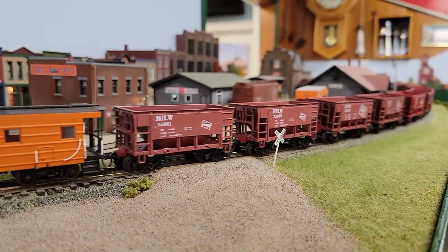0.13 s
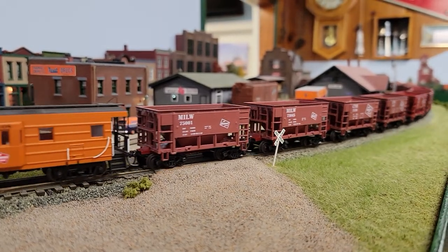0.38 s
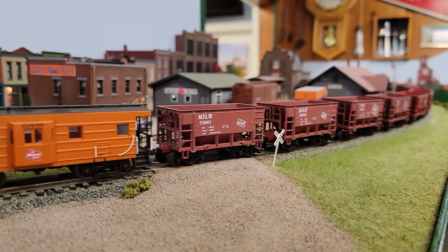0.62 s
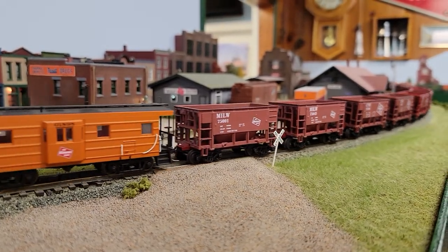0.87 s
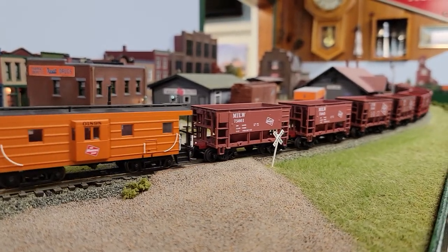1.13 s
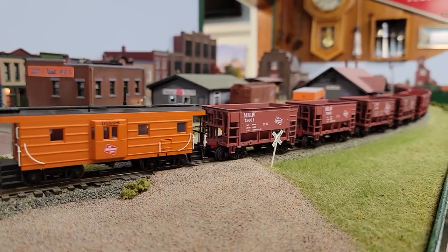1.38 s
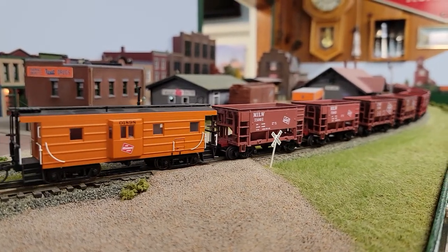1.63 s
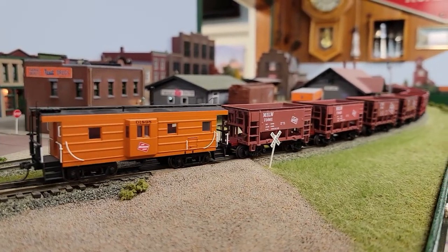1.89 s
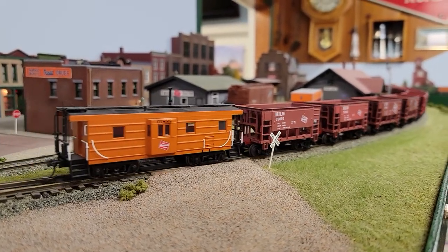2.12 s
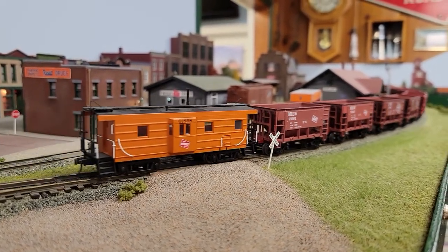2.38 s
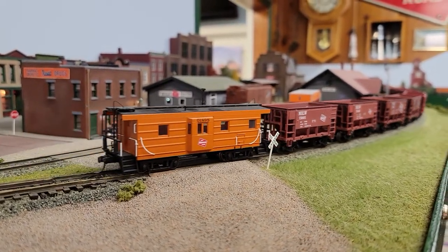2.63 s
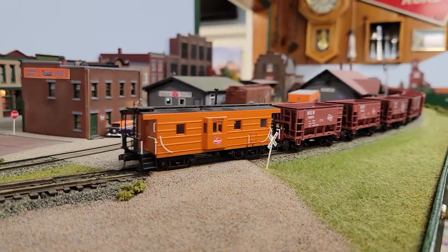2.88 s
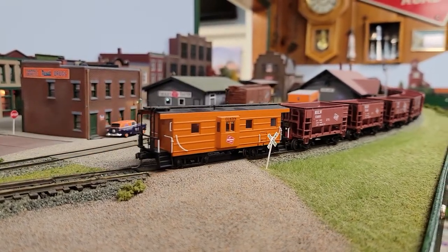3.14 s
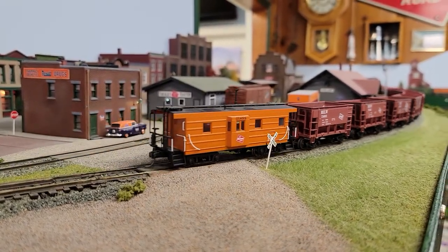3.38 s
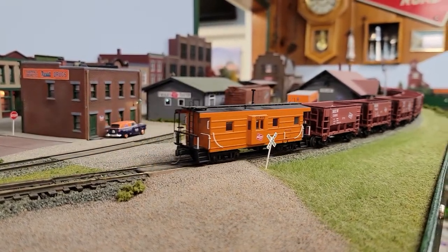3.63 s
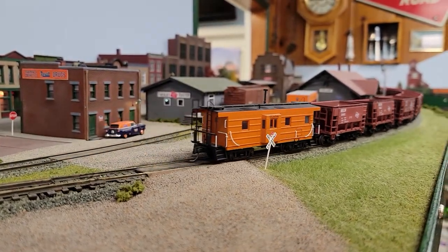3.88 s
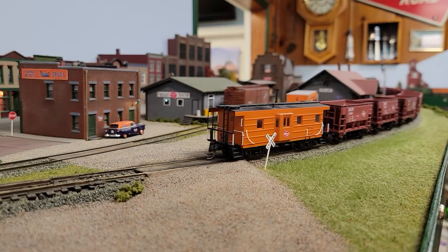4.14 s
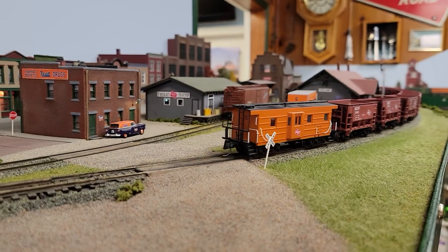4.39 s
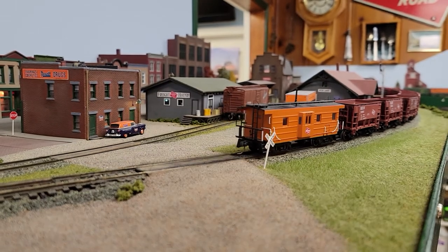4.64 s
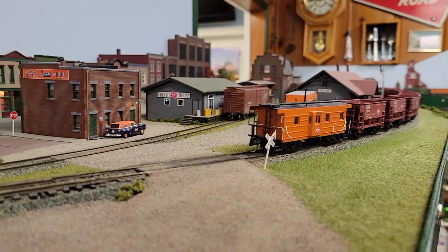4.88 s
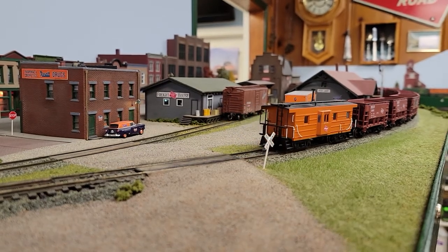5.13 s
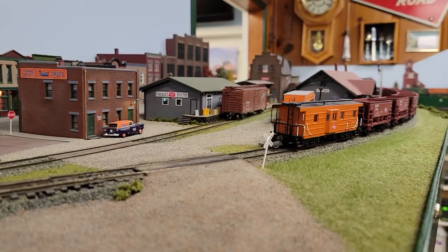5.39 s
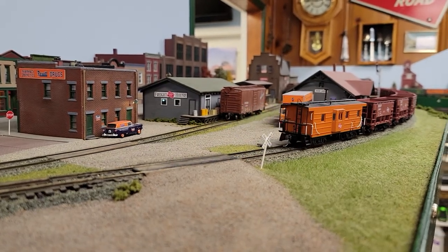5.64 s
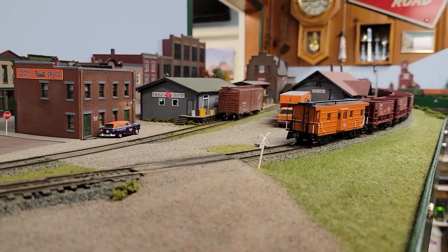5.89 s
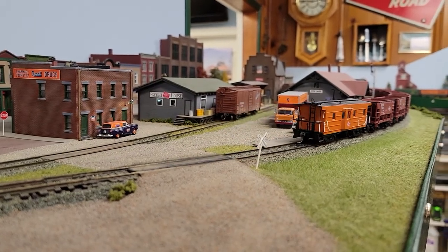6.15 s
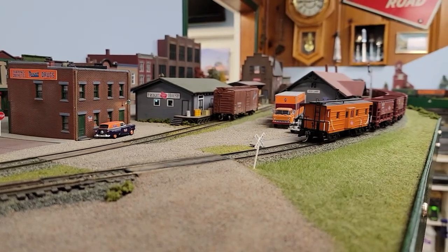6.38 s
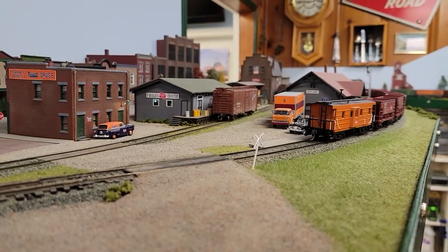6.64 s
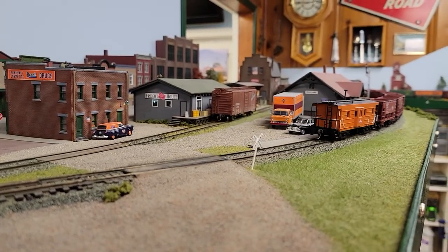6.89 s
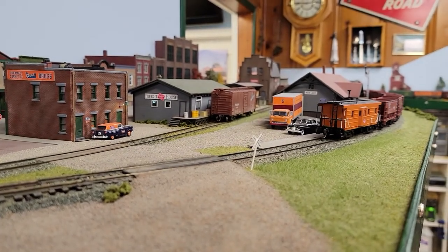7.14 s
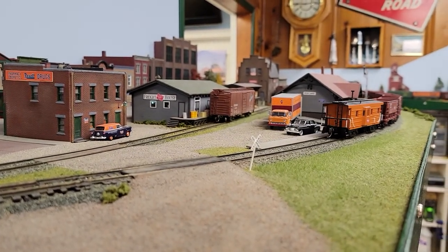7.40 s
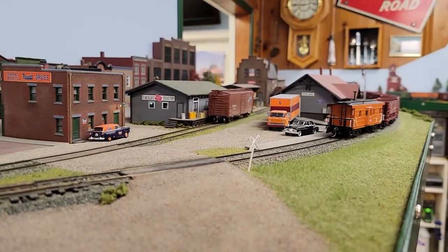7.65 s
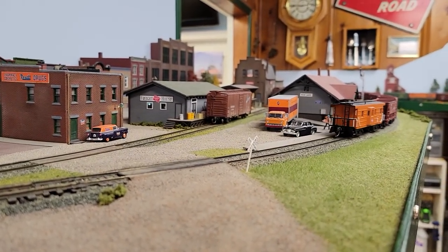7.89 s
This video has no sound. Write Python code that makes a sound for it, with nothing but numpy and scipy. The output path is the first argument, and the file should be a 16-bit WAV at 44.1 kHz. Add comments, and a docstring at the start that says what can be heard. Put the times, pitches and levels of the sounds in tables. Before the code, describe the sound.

A deep constant hum from a compressor, fan and mains gear fills an indoor room. Over it, model train wheels grind softly on rails, car bodies ringing in gentle recurring swells. Thin axle whistles waver early on, flanges scuff briefly, and a few dull knocks come later, closer to the right. The train slowly recedes from a close stereo pair with very faint treble hiss.

```python
"""Wheels grind softly on rails and set car bodies and track ringing as a short model train rolls away.
It follows a curve on a table layout in a furnished room: the rolling is gritty noise, the ringing narrow bands.
Two axles whistle as fluttering sines, tight spots of the wheels sing short notes, flanges scuff, a few pops knock.
A compressor, a fan and mains gear hum in partials over moving air, hiss and faint high tones.
A close pair of microphone ports hears the layout, each with its own level and delay across the spectrum."""
import sys
import numpy as np
from scipy import signal
from scipy.fft import rfft, irfft, next_fast_len
from scipy.io import wavfile

SR = 44100
rng = np.random.default_rng(int(sys.argv[2]) if len(sys.argv) > 2 else 0)


def nominal_scale(level):
    """Amplitude ratio for a level in decibels (scalar or array-like)."""
    x = np.asarray(level, float) / 20
    return 10 ** x


def bounce(signal):
    """Save signal as a 16-bit WAV file at the path given by the first command-line argument."""
    frames = np.transpose(np.atleast_2d(signal))
    limited = np.clip(frames, -1, 1)
    pcm = np.round(limited * 32767).astype(np.int16)
    wavfile.write(sys.argv[1], SR, pcm)


N = 353661
T = np.arange(N) / SR
GRID = next_fast_len(N)   # transform length
HZ = np.maximum(np.arange(GRID // 2 + 1) * SR / GRID, 1)
WHEEL_TURN_S = 1.295
SIDES = np.array([[.5], [-.5]])   # half of a left-right difference goes to each port


def rms_one(x):
    """Scale to unit rms."""
    return x / np.sqrt(np.mean(x ** 2) + 1e-20)


def in_time(rows):
    """Columns of a curve, one value a sample."""
    s, *columns = np.transpose(rows)
    return [np.interp(T, s, c) for c in columns]


def at_hz(points, hz):
    """Columns of a spectrum table on a log-frequency axis."""
    at, *columns = np.transpose(points)
    return [np.interp(np.log(hz), np.log(at), c) for c in columns]


def drift(rate):
    """Slow chance of spread 1: noise at every 50th sample, twice through a one-pole low-pass at rate (Hz)."""
    r = np.exp(-100 * np.pi * rate / SR)
    noise = rng.standard_normal(N // 50 + 3002)
    slow = signal.lfilter([1], [1, -2 * r, r * r], noise)[3000:]   # after the filter has settled
    return np.interp(np.arange(N) / 50, np.arange(len(slow)), rms_one(slow - slow.mean()))


def at_ports(source, other):
    """Spectra at both ports: one shared wave, lagging on the right, mixed with an unrelated one."""
    # the two microphone ports: f/Hz, likeness/0-1, left lead/rad, left-right/dB
    port_pair = [(50, 0.95, .26, -1), (100, 1, 0.17, -3.5), (161, 1, .06, -5), (246, 0.92, 0.14, -4),
                 (336, 1, 1.1, -0.2), (450, 0.66, 0.79, 0), (640, 0.7, 2.18, -2.5), (713, 0, 2, 8.5),
                 (1000, 0.2, 1.3, -3.5), (1260, 0.34, 3.9, -0.5), (1910, 0.58, 2.4, -4),
                 (2400, 0.3, 0.58, -3), (3060, 0.32, 3.45, -3.5), (4320, 0, 1.3, -5), (5070, 0.4, 1.8, -12),
                 (6860, 0.2, 1.1, -8), (8650, 0.5, 0.75, 2), (11000, 0.4, 0.99, -2.5),
                 (12100, 0.3, 1, -6.5), (14600, .2, 1.1, -1.5)]
    alike, lead, balance_db = at_hz(port_pair, HZ)
    alike = np.clip(alike, 0, 1)
    left = rfft(source, GRID)
    shared = alike * np.exp(-1j * lead) * left
    right = shared + np.sqrt(1 - alike ** 2) * rfft(other, GRID)
    return np.array([left * nominal_scale(balance_db / 2), right * nominal_scale(-balance_db / 2)])


def coloured(spectrum, noise):
    """Stereo noise spectra given a colour, silent outside it."""
    inside = (HZ >= spectrum[0][0]) & (HZ <= spectrum[-1][0])
    return at_ports(*noise) * nominal_scale(at_hz(spectrum, HZ)[0]) * inside


def grit(per_s, spread_db):
    """Dense tiny bumps of wheel on rail, uneven in size, for two paths."""
    sizes_db = spread_db * np.minimum(rng.exponential(1, (2, N)), 5)
    bumps = nominal_scale(sizes_db) * rng.choice([-1, 1], (2, N))
    return rms_one(bumps * (rng.random((2, N)) < per_s / SR))


def rolling(level_db, treble_db, patchy_db=.8, throb_db=.6):
    """Grit in half-octave bands; out-of-round wheels make all throb irregularly, each band flickers alone."""
    # colour of wheels on rail: f/Hz, relative level/dB
    rail_colour = [(600, -11.5), (800, -13.5), (955, -9), (1050, -15), (1180, -3), (1500, -7.5), (1750, -7),
                   (2160, -14.5), (2750, -15), (3080, -18.5), (4250, -19), (4700, -28.5), (5400, -34),
                   (6600, -34), (7300, -40), (9000, -49)]
    spectra = coloured(rail_colour, grit(9000, spread_db=2.5))
    out, throb = 0, drift(5.0)
    for centre in np.arange(9.5, 13.6, .5):   # log2 of Hz
        band = np.cos(np.pi * np.clip(np.log2(HZ) - centre, -.5, .5)) ** 2
        # grows per octave above 1450 Hz, up to 1.2 octaves
        far_db = treble_db * np.clip(centre - 10.5, 0, 1.2)
        motion_db = far_db + throb_db * throb + patchy_db * drift(5.2)
        out = out + irfft(spectra * band, GRID)[:, :N] * nominal_scale(motion_db)
    return nominal_scale(-44.5 + level_db) * rms_one(out)


def bodies(level_db):
    """Noise drives narrow rings; an out-of-round wheel swells each twice a turn, each at its own moment."""
    # pitches of cars and track: f/Hz
    body_pitches = [1120, 1184, 1222, 1272, 1345, 1411, 1547, 1580, 1663, 1718, 1815, 2008, 2759, 3245,
                    3396, 3850, 3997]
    # each ring in turn, ahead of swell and fade: width/Hz, left level/dB, right level/dB,
    # growth/dB per s as the cars turn on the curve
    body_rings = [(35, -68, -56, 0.4), (24, -56, -57, -.3), (18, -66, -60.5, 0.5), (26, -66.5, -66.5, -1),
                  (32, -62, -58.5, -1), (22, -60, -60, 0.3), (24, -68, -60.5, -1.5), (18, -73.5, -67.5, -2),
                  (36, -69.5, -67, 1.3), (18, -61.5, -61, .8), (54, -69.5, -60.5, -0.8), (30, -71, -64, -1),
                  (75, -71.5, -66.5, 2.1), (80, -73, -75.5, 1.5), (60, -71.5, -64.5, 0),
                  (52, -75, -70.5, -1), (50, -76.5, -78.5, -2.5)]
    swell_db, waver_db = 4.5, 1.5
    lean_db_per_s = -0.37   # added on the left, taken off on the right: the rings lean to the right
    drive, out, later = at_ports(*rng.standard_normal((2, N))), 0, T - T.mean()
    moments = rng.random(len(body_rings))
    for hz, (width, left_db, right_db, growth_db), moment in zip(body_pitches, body_rings, moments):
        ring = irfft(drive / (1 + (2 * (HZ - hz) / width) ** 2), GRID)[:, :N]   # steep skirts
        ring /= ring.std(axis=1, keepdims=True)
        turn_db = swell_db * np.cos(np.pi * (2 * T / WHEEL_TURN_S - moment)) ** 6
        sides_db = np.array([[left_db], [right_db]]) + lean_db_per_s * later * [[1], [-1]]
        out = out + ring * nominal_scale(sides_db + growth_db * later + turn_db + waver_db * drift(3.0))
    return out * nominal_scale(level_db)


def axle(hz, level_db):
    """A thin dry whistle: one sine, fluttering in pitch and level."""
    phase = 2 * np.pi * np.cumsum(hz * (1 + .0025 * drift(8.0))) / SR
    flutter_db = 2.5 * drift(14.0)
    sides_db = level_db + flutter_db + np.array([[-2.2], [1.2]])
    return nominal_scale(sides_db) * np.sqrt(2) * np.sin(phase + [[.45], [-.45]])


def low_axle():
    """The lower axle whistles on and off, following a level curve."""
    # ahead of flutter and side balance: t/s, level/dB
    low_whistle = [(0, -63), (.8, -56.5), (1.25, -66), (1.5, -56), (1.9, -58.5), (2.4, -64), (2.78, -59),
                   (3.1, -64), (5, -67), (8.02, -68)]
    return axle(2373, in_time(low_whistle)[0])


def high_axle():
    """The higher axle sings on the tightest part of the curve, rising and falling in straight dB slopes."""
    # ahead of flutter and side balance: f/Hz, loudest t/s, level there/dB, fall/dB per s either side
    high_song = (3793, 3.35, -64, 12)
    hz, s, peak_db, fall_db = high_song
    return axle(hz, peak_db - fall_db * abs(T - s))


def tight_spots():
    """A short wavering note each time a tight spot of a wheel comes round."""
    # singing once a turn: f/Hz, first note t/s, left-right/dB, list of level/dB of each turn (ahead of waver)
    singing_spots = [(4286, 1.215, -9, [-64.5, -66, -67, -62, -66, -63]),
                     (1184, .86, 12, [-51, -52, -54, -62]), (1184, .6, 12, [-55, -56, -59]),
                     (1184, 1.31, 12, [-56, -55, -60])]
    note_s = .045   # spread of the bell-shaped envelope
    out = 0
    for hz, first_s, balance_db, peaks_db in singing_spots:
        touch = 0
        for turn_number, peak_db in enumerate(peaks_db):
            since = T - first_s - turn_number * WHEEL_TURN_S
            touch = touch + nominal_scale(peak_db) * np.exp(-(since / note_s) ** 2 / 2)
        phase = 2 * np.pi * np.cumsum(hz * (1 + .004 * drift(10.5))) / SR
        sides_db = 1.5 * drift(25.0) + balance_db * SIDES
        out = out + touch * nominal_scale(sides_db) * np.sqrt(2) * np.sin(phase)
    return out


def scuffs(rise_s=.005):
    """A flange rubs the rail: short bright puffs of noise, each about an octave wide; two very high ones near
    5.7 s are sharp ticks among the pops."""
    # ahead of envelope and side gains: t/s, level/dB, centre f/Hz; the rows near 5.7 s at 12-13 kHz are high
    # ticks
    bright_puffs = [(1.111, -59, 6300), (2.398, -65, 5600), (2.494, -65, 5600), (2.543, -64, 5600),
                    (4.248, -66, 5600), (4.557, -66, 6000), (4.63, -63, 6200), (4.679, -65, 6000),
                    (5.65, -72, 12500), (5.732, -66, 13000), (6.049, -66, 5600), (6.946, -67, 6200),
                    (7.068, -62, 6400)]
    t60_s, span = .11, 1.45   # decay; band edges as a ratio to the centre
    out, t = np.zeros((2, N)), np.arange(SR // 5) / SR
    noises = rng.standard_normal((len(bright_puffs), 2, len(t)))
    for (s, scuff_db, hz), noise in zip(bright_puffs, noises):
        bright = signal.butter(3, [hz / span, hz * span], "band", fs=SR, output="sos")
        envelope = nominal_scale(scuff_db) * 1000. ** (-t / t60_s) * (1 - np.exp(-t / rise_s))
        out[:, round(s * SR):][:, :len(t)] += envelope * rms_one(signal.sosfilt(bright, noise))
    return out * nominal_scale([[1.5], [4.5]])


def pops():
    """Each pop is a short knock of a few cycles, sliding down, close to the right port."""
    # level at the right port: t/s, peak/dB, mean f/Hz
    port_pops = [(4.2738, -32, 800), (5.3585, -33, 1000), (5.4725, -28, 800), (5.5922, -26, 1050)]
    cycles = 4
    out, t = np.zeros(N), np.arange(600) / SR
    for s, peak_db, hz in port_pops:
        done = np.minimum(t * hz / cycles, 1)
        knock = np.sin(2 * np.pi * cycles * done ** .5) * np.sin(np.pi * done)
        out[round(s * SR):][:len(t)] += nominal_scale(peak_db) * knock
    return out * nominal_scale([[-12.0], [0]]) * [[-1], [1]]   # the left port gets a weak opposite pull


def hum(hz, partials, waver_db, wander):
    """Partials of one rotating or buzzing part, level (dB) and phase (rad) drifting a little."""
    out, phase = 0, 2 * np.pi * (hz * T + rng.random()) + wander * drift(0.6)
    for multiple, level_db, balance_db, lead in partials:
        wave = np.sqrt(2) * np.sin(multiple * phase + 2 * np.pi * rng.random() + lead * SIDES)
        out = out + nominal_scale(level_db + balance_db * SIDES + waver_db * drift(0.9)) * wave
    return out


def machines():
    """Compressor, mains gear and fan, each a stack of partials on its own base pitch."""
    # partials of each machine: multiple of base pitch, level/dB, left-right/dB, left lead/rad
    compressor_partials = [(1, -28.6, -.55, .29), (2, -49, -2.8, .05), (3, -48.7, -3.1, .02),
                           (9, -62, -5, 1.6), (10, -59.5, 1.6, 1.0)]
    mains_partials = [(1, -49.5, 2.5, .01), (2, -49, 2.1, .01), (3, -52.5, 10, 1.1), (4, -61.5, -2, 0.88)]
    fan_partials = [(1, -40, -.3, .24), (1.8013, -54.5, -2.7, .15)]
    compressor = hum(57.36, compressor_partials, waver_db=-0.23, wander=0.085)
    mains = hum(120.03, mains_partials, waver_db=1.43, wander=0.017)
    fan = hum(74.07, fan_partials, waver_db=0.9, wander=0.55)
    return compressor + mains + fan


def air():
    """Smooth rumble of moving air: coloured noise."""
    # f/Hz, relative level/dB
    air_colour = [(20, -39), (33, -21), (44, -12), (52, -10.5), (66, -10.5), (88, -10), (105, -22),
                  (135, -18), (160, -21), (190, -17), (225, -23.5), (255, -20.5), (320, -24.5),
                  (345, -19.5), (420, -24), (566, -22), (800, -30.5), (1100, -31.5)]
    rumble = irfft(coloured(air_colour, rng.standard_normal((2, N))), GRID)[:, :N]
    return nominal_scale(-41) * rms_one(rumble)


def microphone_hiss():
    """Hiss of the microphone: coloured noise in the treble."""
    # f/Hz, relative level/dB
    hiss_colour = [(6000, -6), (7500, -3), (8500, -3), (9100, -2), (9600, -5), (10200, -7), (11500, -4),
                   (12300, 1), (13000, -2.5), (14000, -1.5), (14600, -3), (16000, -3)]
    hiss = irfft(coloured(hiss_colour, rng.standard_normal((2, N))), GRID)[:, :N]
    return nominal_scale(-74.5) * rms_one(hiss)


def whine():
    """Very faint steady sines high in the hiss, alike at both ports."""
    # f/Hz, level/dB
    faint_tones = [(5251, -92), (7523, -97), (8752, -100), (9259, -99), (9841, -104), (10503, -103),
                   (12153, -100), (12254, -98), (12732, -99), (13310, -101), (13889, -97), (14003, -99),
                   (14468, -102)]
    hz, level_db = np.transpose(faint_tones)[:, :, None]
    phase = 2 * np.pi * (hz * T + rng.random((len(faint_tones), 1)))
    return np.sum(nominal_scale(level_db) * np.sqrt(2) * np.sin(phase), axis=0)


def scene():
    """Hums and air stay; rolling and rings fade with distance, and the train drifts slightly to the right."""
    nearest_s, recede_s = .8, 6.3   # closest moment; time to roll one closest distance
    treble_keeps = 0.67   # share of the fade that the treble escapes, per octave
    pan_db_per_s = -0.02   # left-right
    level_db = -20 * np.log10(np.hypot(1, (T - nearest_s) / recede_s))
    level_db = level_db - level_db.mean()
    train = rolling(level_db, -treble_keeps * level_db) + bodies(level_db)
    train = train + low_axle() + high_axle() + tight_spots() + scuffs()
    train = train * nominal_scale(pan_db_per_s * (T - T.mean()) * SIDES)
    return train + pops() + machines() + air() + microphone_hiss() + whine()


def band_limit(x):
    """A steep low-pass at the top of the band."""
    return signal.sosfilt(signal.butter(12, 15720, fs=SR, output="sos"), x)


def record(dry):
    """The finished mix of both ports, as it is kept."""
    return band_limit(dry)


dry = scene()
out = record(dry)
bounce(out)
```